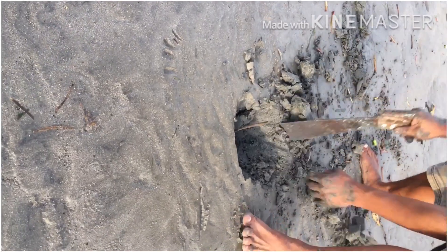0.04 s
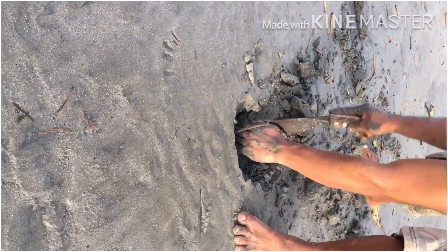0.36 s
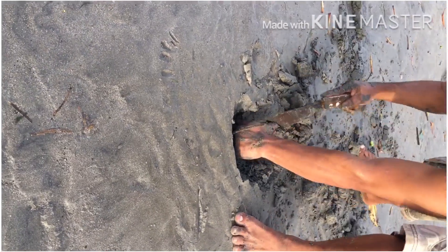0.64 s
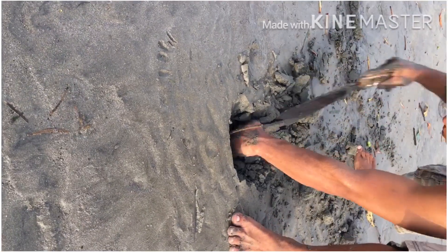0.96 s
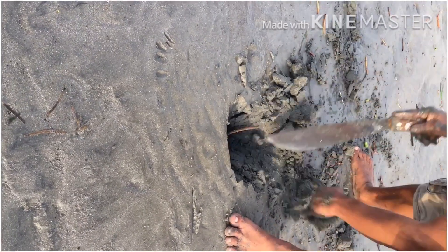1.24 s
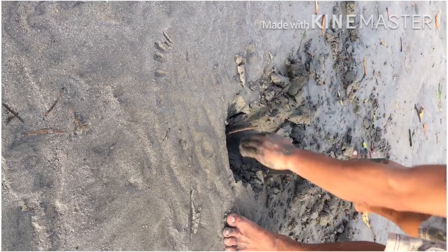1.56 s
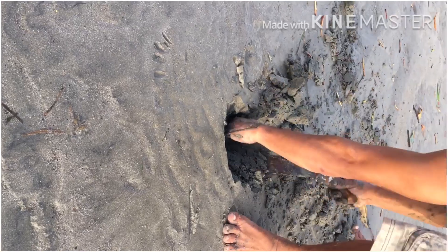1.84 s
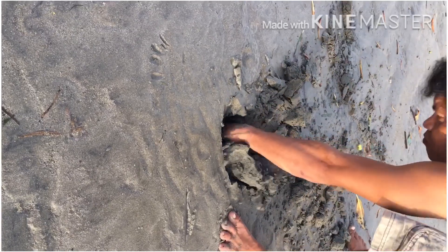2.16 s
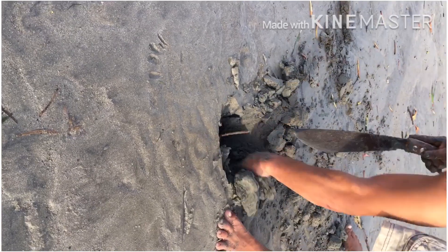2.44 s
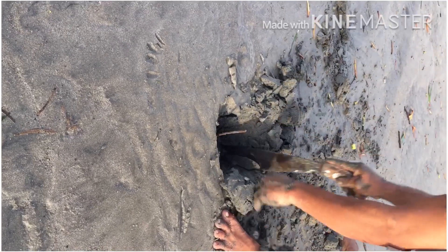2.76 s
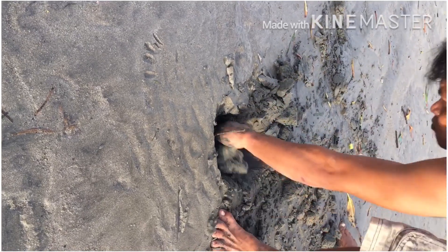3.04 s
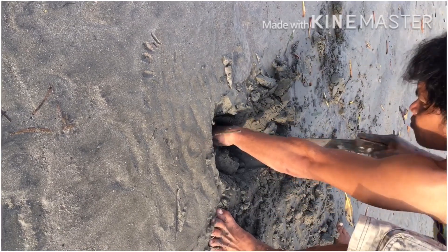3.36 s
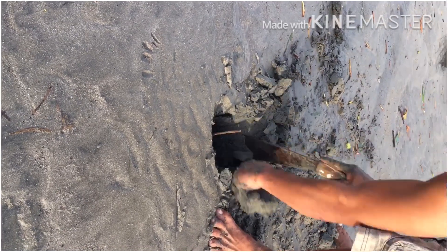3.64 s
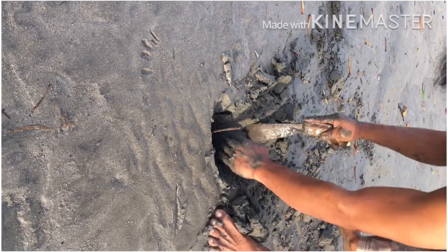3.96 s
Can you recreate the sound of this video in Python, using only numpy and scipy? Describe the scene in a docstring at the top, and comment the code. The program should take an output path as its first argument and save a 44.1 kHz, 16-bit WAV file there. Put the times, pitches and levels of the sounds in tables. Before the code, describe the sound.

A steel blade and a hand scrape wet sand close by in short, gritty strokes throughout, with light crumbling and a faint metallic ring. Deeper cuts rasp hollowly at the start, around 1.5 and 2.7 seconds, and from 3.6 seconds to the end. The blade ticks sharply on something hard at 3.2 seconds. Wind rumbles and thumps unevenly on the microphone over faint, steady surf.

```python
"""A long steel blade and a bare hand dig a hole in wet sand on a windy shore.
Each stroke sets off a dense hiss of grains that makes the blade ring faintly; deep cuts rasp with a
hollow, gliding tone. The blade ticks once on something hard.
Wind rumbles and buffets the microphone over a faint wash of surf."""
import sys
import numpy as np
from scipy import signal
from scipy.fft import rfft, irfft
from scipy.io import wavfile

SR = 44100
rng = np.random.default_rng(int(sys.argv[2]) if len(sys.argv) > 2 else 0)


def master_out(mix):
    """Clip the mix to full scale and print it as 16-bit PCM to the path in sys.argv[1]."""
    frames = np.transpose(np.atleast_2d(mix))
    ceiling = np.clip(frames, -1, 1)
    pcm = np.round(ceiling * 32767).astype(np.int16)
    wavfile.write(sys.argv[1], SR, pcm)


N = 176400
T = np.arange(N) / SR

# sand hiss spectrum: freq_hz, relative_db
SAND_SPECTRUM = [(400, 6), (800, -1), (1050, 3.5), (1900, 5), (3100, 0), (3900, 2.5), (5300, 0),
                 (7000, 0.5), (9200, 0.5), (10400, -4), (12500, -1.5), (15500, -5.5)]
# blade modes: pitch_hz, width_hz, cutting_db, sliding_db
BLADE_MODES = [(3110, 110, -5, -18), (4700, 130, -7, -6), (5910, 130, -5, 0), (7100, 220, -1, -9),
               (8400, 220, -4, -4), (9590, 240, -5, -9), (12080, 320, -7, 0), (13680, 260, -13, -4),
               (15350, 220, -16, -13)]


def strokes(modes):
    """Blade and hand push through sand: gritty hiss and the blade ring it excites."""
    # start_s, length_s, level_db, attack_s, release_s, tilt_db_per_octave, ring_db
    stroke_plan = [(-.06, 0.47, -42.5, 0.18, 0.35, 0, -5.5), (0.479, 0.15, -50.5, 0.086, 0.098, -1, -5),
                   (0.601, 0.24, -47.5, 0.13, 0.14, -3, -15), (0.82, 0.44, -53, 0.081, 0.11, -3, -12),
                   (0.896, 0.076, -59, 0.034, 0.027, 5, -22), (1.319, 0.032, -53, .004, 0.022, 2, -18),
                   (1.362, 0.48, -45.5, 0.16, 0.17, -1.5, -6.5), (1.92, 0.14, -47, 0.014, 0.059, -2, -12),
                   (2.069, .18, -49.5, 0.074, 0.066, 0, -13), (2.287, 0.19, -55.5, 0.03, 0.057, -2, -15),
                   (2.432, 0.16, -50.5, 0.1, 0.097, 1, -7), (2.668, 0.21, -44, 0.014, 0.088, 3, -5),
                   (2.961, 0.3, -50, 0.097, 0.14, -1.7, -14), (3.211, 0.27, -54, 0.013, 0.038, -3, -13),
                   (3.471, 0.26, -45, 0.12, 0.15, 0.5, -5.5), (3.664, 0.24, -41.5, 0.13, 0.2, -0.5, -14),
                   (3.971, 0.06, -36.5, 0.0078, 0.07, -4.5, -26)]
    sand = grit()
    ring = rms_one(from_db([cutting_db for _, _, cutting_db, _ in BLADE_MODES]) @ modes)
    out = np.zeros(N)
    for start_s, length_s, level_db, attack_s, release_s, tilt, ring_db in stroke_plan:
        envelope = from_db(level_db) * swell(start_s, length_s, attack_s, release_s)
        out += envelope * (colour(sand, SAND_SPECTRUM, tilt) + from_db(ring_db) * ring)
    return out


def crumbling():
    """Sand crumbles lightly under the fingers."""
    # start_s, length_s, level_db
    spells = [(-.05, 1.236, -56), (1.32, 2.8, -57.5)]
    envelope = sum(from_db(level_db) * swell(start_s, length_s, attack_s=.008, release_s=.039)
                   for start_s, length_s, level_db in spells)
    return envelope * colour(grit(), SAND_SPECTRUM, tilt_db_per_octave=-.25)


def grit(clump_db=-5):
    """Fine grains with breaking lumps among them."""
    return grains() + from_db(clump_db) * clumps()


def grains(slips_per_s=14000, spread_db=2.5, hiss_db=2.5):
    """Countless tiny slips of sand, a few larger than the rest, on a smooth hiss; rms 1."""
    sizes = from_db(spread_db * np.minimum(rng.exponential(1, N), 5)) * rng.choice([-1, 1], N)
    slips = rms_one(sizes * (rng.random(N) < slips_per_s / SR))
    return rms_one(slips + from_db(hiss_db) * rng.standard_normal(N))


def clumps(base_rate_per_s=700, spread_db=3.5, pitch_count=18, q=9):
    """Wet lumps break in bunches: tiny ticks, each at a random pitch; rms 1."""
    breaks = rng.random(N) < base_rate_per_s * flicker(spread_db=4, rate_hz=50) / SR
    sizes = from_db(spread_db * np.minimum(rng.exponential(1, N), 3)) * rng.choice([-1, 1], N)
    pitch_index = rng.integers(0, pitch_count, N)
    floor = 1e-18 * pitch_index  # avoids denormals
    return rms_one(sum(resonance(breaks * sizes * (pitch_index == k) + floor, hz, hz / q)
                       for k, hz in enumerate(np.linspace(2500, 15000, pitch_count))))


def deep_cuts(fade_share=.36):
    """Juddering friction in resonances that glide as the blade sinks."""
    # start_s, length_s, level_db, first_hz, last_hz, width_hz
    rasps = [(0.02, 0.36, -51, 1320, 1300, 260), (0.035, 0.15, -51, 1640, 1740, 380),
             (0.05, 0.29, -51, 3130, 3180, 520), (0.15, 0.2, -51.5, 1850, 2020, 420),
             (0.175, 0.065, -44.5, 1280, 1360, 220), (0.2, 0.15, -50, 900, 816, 240),
             (1.418, 0.13, -50.5, 3200, 3100, 400), (1.44, .33, -53, 4400, 4300, 450),
             (1.459, .14, -46.5, 2330, 2020, 540), (1.57, .12, -45.5, 1460, 1370, 260),
             (1.58, .14, -49, 2200, 1950, 700), (1.68, .11, -48.5, 1430, 1300, 320),
             (1.93, .09, -52, 900, 780, 300), (2.665, 0.21, -46.5, 2400, 2200, 750),
             (2.675, .18, -45.5, 7500, 7300, 2200), (2.74, .11, -49, 3500, 3400, 1600),
             (3.08, .14, -57, 1750, 1700, 300), (3.52, .14, -52, 2700, 2600, 900),
             (3.646, 0.23, -43.7, 1290, 1345, 240), (3.699, 0.176, -45.3, 2800, 2700, 950),
             (3.709, 0.134, -48, 6700, 6800, 1000), (3.971, .05, -34.5, 1330, 1285, 400)]
    out = np.zeros(N)
    for start_s, length_s, level_db, first_hz, last_hz, width_hz in rasps:
        pitch_hz = np.interp(T, [start_s, start_s + length_s], [first_hz, last_hz])
        fade_s = fade_share * length_s
        rasp = glide(rng.standard_normal((2, N)), pitch_hz, width_hz)
        out += from_db(level_db) * swell(start_s, length_s, fade_s, fade_s) * rasp
    return out * flicker(spread_db=.5, rate_hz=160)


def blade_ring(detune=.006):
    """Blade modes, one row each: the shifting sand load detunes them and lets each flare."""
    modes = []
    for pitch_hz, width_hz, _, _ in BLADE_MODES:
        flare = flicker(spread_db=4, rate_hz=22)
        friction = rng.standard_normal((2, N))
        loaded_hz = pitch_hz * (1 + detune * drift(rate_hz=12))
        modes.append(rms_one(flare * glide(friction, loaded_hz, width_hz)))
    return np.array(modes)


def blade_slides(modes, fade_s=.081, focus_octaves=.45):
    """Lightly touched, the blade sings in the modes near a pitch the contact point favours."""
    # start_s, length_s, level_db, favoured_hz
    touches = [(.895, 0.11, -52, 12400), (.895, 0.12, -55.5, 5440), (2.72, 0.16, -51, 6700),
               (3.02, 0.23, -57, 13000), (3.24, 0.23, -62.5, 9300)]
    pitch_hz, _, _, sliding_db = np.transpose(BLADE_MODES)
    out = np.zeros(N)
    for start_s, length_s, level_db, favoured_hz in touches:
        weights = from_db(sliding_db) / (1 + (np.log2(pitch_hz / favoured_hz) / focus_octaves) ** 2)
        out += from_db(level_db) * swell(start_s, length_s, fade_s, fade_s) * rms_one(weights @ modes)
    return out


def blade_tick(start_s=3.2194, level_db=-27, rise_s=.0004, tail_db=-16):
    """The blade catches shell or stone: a hard snap with a faint tail."""
    # freq_hz, relative_db
    tick_spectrum = [(900, 0.5), (2600, -13), (4200, -4.5), (5400, -19), (6900, 12), (7900, -8), (8800, 1),
                     (10700, -14), (12500, 2), (14000, -20)]
    snap = burst(T - start_s, rise_s, t60_s=.006)
    tail = from_db(tail_db) * burst(T - start_s, rise_s, t60_s=.022)
    return from_db(level_db) * (snap + tail) * colour(rng.standard_normal(N), tick_spectrum)


def wind_rumble(gain_db=2):
    """Lumpy rumble on the microphone that follows the wind's strength."""
    # time_s, relative_db
    strength = [(0.0, -25), (0.13, -33), (0.17, -28.5), (0.3, -41.5), (0.34, -30), (.68, -31.5), (.73, -48),
                (.77, -28.5), (0.89, -35), (1.021, -40), (1.15, -31), (1.27, -28), (1.45, -29), (1.5, -34),
                (1.78, -29), (1.87, -31.5), (1.92, -26), (2.02, -32), (2.1, -28.5), (2.4, -35),
                (2.741, -41.5), (2.82, -36), (3.2, -36.5), (3.35, -39.5), (3.57, -27.5), (3.73, -38),
                (3.8, -33.5), (4.0, -31)]
    # freq_hz, relative_db
    rumble_spectrum = [(20, -20), (31, -14), (40, -7), (47, -3.5), (55, 1), (70, 2), (95, -3), (130, -4),
                       (230, -15.5), (400, -24), (700, -40), (1300, -61)]
    time_s, strength_db = np.transpose(strength)
    eddies = rng.standard_normal(N) * flicker(spread_db=3, rate_hz=22.9)
    return from_db(gain_db + np.interp(T, time_s, strength_db)) * colour(eddies, rumble_spectrum)


def wind_buffets(gain_db=-1.5, wake_db=4, rise_s=.003086, low_hz=67.4, size=4096):
    """Single eddies hit the microphone: a push or pull, then a dying wake; each has its own brightness."""
    # time_s, relative_peak_db, top_hz
    eddies = [(.026, -18, 300), (0.081, -21.5, 212), (0.144, -20, 316), (0.167, -8.5, 278),
              (0.212, -20, 138), (.255, -21.5, 233), (.343, -16, 256), (0.412, -17.5, 197),
              (.454, -22.5, 179), (0.492, -19.5, 250), (0.586, -25.5, 263), (.632, -16.5, 164),
              (.682, -17, 348), (0.754, -19, 260), (.785, -21.5, 137), (0.912, -25, 297),
              (1.141, -17.5, 202), (1.216, -13.5, 318), (1.226, -13, 157), (1.346, -17, 209),
              (1.394, -14.5, 189), (1.441, -17.5, 263), (1.555, -21, 230), (1.636, -18.5, 220),
              (1.706, -13.5, 210), (1.76, -15, 192), (1.905, -14, 282), (1.924, -15, 278),
              (2.055, -15.5, 176), (2.217, -13.5, 270), (2.389, -20, 194), (2.455, -19, 167),
              (2.824, -18.5, 189), (2.886, -19.5, 270), (2.947, -21, 325), (2.974, -20, 332),
              (3.025, -25.5, 256), (3.23, -20.5, 330), (3.249, -21, 252), (3.411, -19, 192),
              (3.468, -22.5, 196), (3.52, -14, 332), (3.539, -14.5, 198), (3.592, -16.5, 325),
              (3.613, -15, 230), (3.762, -18, 205), (3.802, -18, 245), (3.844, -13.5, 286),
              (3.921, -16, 152)]
    high_pass = signal.butter(2, low_hz, "high", fs=SR, output="sos")
    push = np.arange(size) == 0
    decay = burst(np.arange(size) / SR, rise_s, t60_s=.058)
    wake = from_db(wake_db) * decay / np.linalg.norm(decay)
    out = np.zeros(N + size)
    for time_s, peak_db, top_hz in eddies:
        turbulence = rng.standard_normal(size)
        band = np.vstack([high_pass, signal.butter(4, top_hz, fs=SR, output="sos")])
        thump = signal.sosfilt(band, np.sign(turbulence[0]) * push + turbulence * wake)
        onset = int((time_s - rise_s) * SR)
        out[onset:onset + size] += from_db(peak_db + gain_db) * thump / np.abs(thump).max()
    return out[:N]


def surf(level_db=-51):
    """Steady wash of distant waves."""
    # freq_hz, relative_db
    surf_spectrum = [(150, 2), (500, 1.5), (1000, -7.5), (2000, -13.5), (4000, -24), (9000, -28),
                     (15500, -21.5)]
    return from_db(level_db) * colour(rng.standard_normal(N), surf_spectrum)


def from_db(db):
    """Decibels to gain."""
    return 10 ** (np.asarray(db) / 20)


def rms_one(x):
    """Scale to unit rms."""
    return x / np.sqrt(np.mean(x ** 2) + 1e-20)


def colour(x, spectrum, tilt_db_per_octave=0):
    """Apply a spectrum, tilted about 4 kHz; rms 1."""
    octave = np.log2(np.maximum(np.fft.rfftfreq(N, 1 / SR), 1) / 4000)
    hz, db = np.transpose(spectrum)
    knots = np.log2(hz / 4000)
    tilt_db = tilt_db_per_octave * np.clip(octave, knots[0], knots[-1])
    return rms_one(irfft(rfft(x) * from_db(np.interp(octave, knots, db) + tilt_db), N))


def drift(rate_hz):
    """Random motion, mostly below rate_hz; rms 1."""
    rolloff = 1 + (np.fft.rfftfreq(N, 1 / SR) / rate_hz) ** 2
    return rms_one(irfft(rfft(rng.standard_normal(N)) / rolloff, N))


def flicker(spread_db, rate_hz):
    """Gain wandering about 0 dB."""
    return from_db(spread_db * drift(rate_hz))


def resonance(x, pitch_hz, width_hz):
    """Two-pole resonance; rms 1."""
    radius = np.exp(-np.pi * width_hz / SR)
    feedback = [1, -2 * radius * np.cos(2 * np.pi * pitch_hz / SR), radius * radius]
    return rms_one(signal.lfilter([1, 0, -1], feedback, x))


def glide(friction, pitch_hz, width_hz):
    """Two rows of friction noise form one band around a moving pitch; rms 1."""
    low_pass = signal.butter(2, width_hz / 2, fs=SR, output="sos")
    in_phase, quadrature = rms_one(signal.sosfilt(low_pass, friction))
    phase = 2 * np.pi * np.cumsum(pitch_hz) / SR
    return in_phase * np.cos(phase) + quadrature * np.sin(phase)


def swell(start_s, length_s, attack_s, release_s):
    """Envelope with quarter-sine rise and fall."""
    rise = np.sin(np.pi / 2 * np.clip((T - start_s) / attack_s, 0, 1))
    fall = np.sin(np.pi / 2 * np.clip((start_s + length_s - T) / release_s, 0, 1))
    return rise * fall


def burst(age_s, rise_s, t60_s):
    """Linear rise, exponential fall."""
    return np.clip(age_s / rise_s, 0, 1) * 1000 ** (-np.maximum(age_s - rise_s, 0) / t60_s)


def scene():
    """Digging close by, wind on the microphone, surf far off; mono."""
    wash = surf()
    modes = blade_ring()
    scraping = (strokes(modes) + crumbling()) * flicker(spread_db=.2, rate_hz=34.8)  # slight judder
    digging = scraping + blade_slides(modes) + deep_cuts() + blade_tick()
    return (digging + wind_rumble() + wind_buffets() + wash)[None]


def record(dry, cutoff_hz=15750):
    """Steep low-pass."""
    return signal.sosfilt(signal.ellip(12, .2, 80, cutoff_hz, fs=SR, output="sos"), dry)


dry = scene()
out = record(dry)
master_out(out)
```